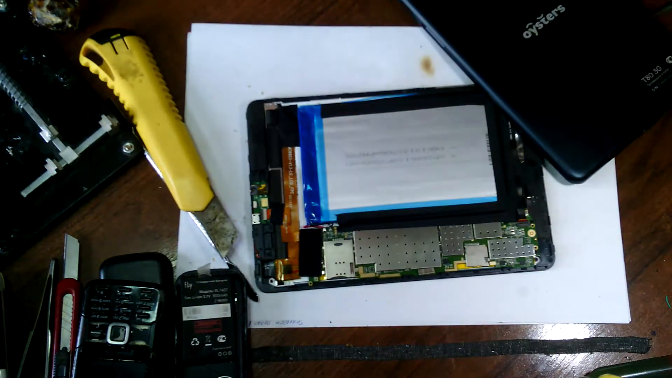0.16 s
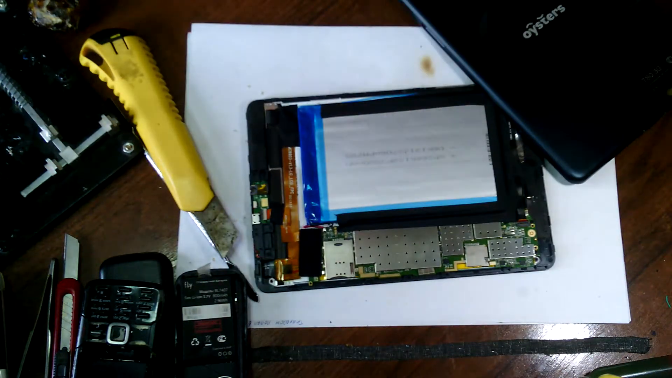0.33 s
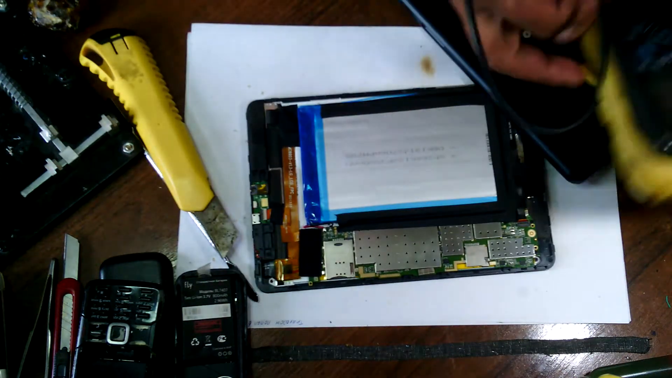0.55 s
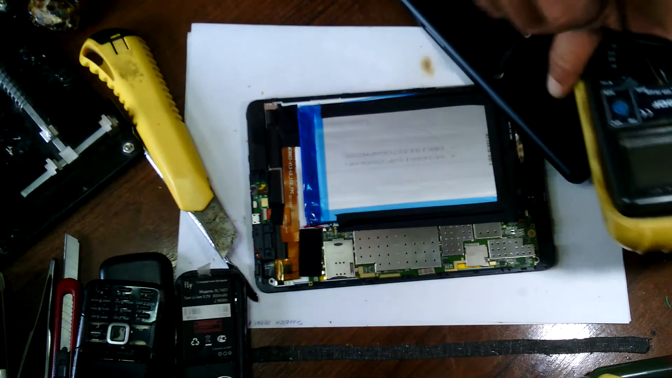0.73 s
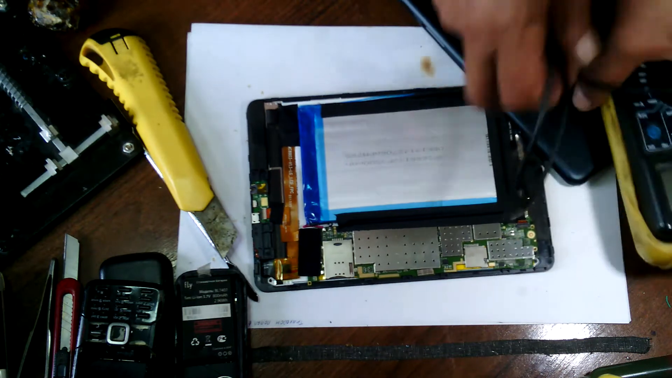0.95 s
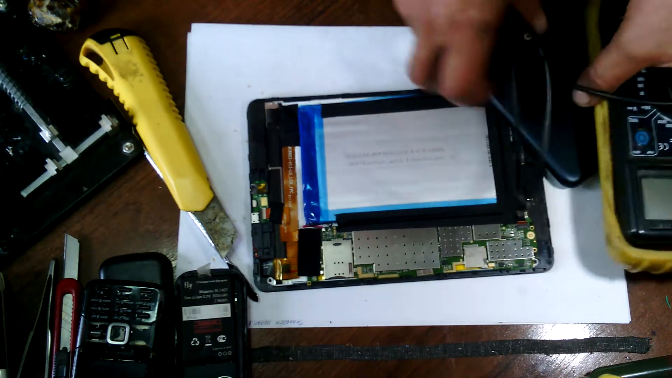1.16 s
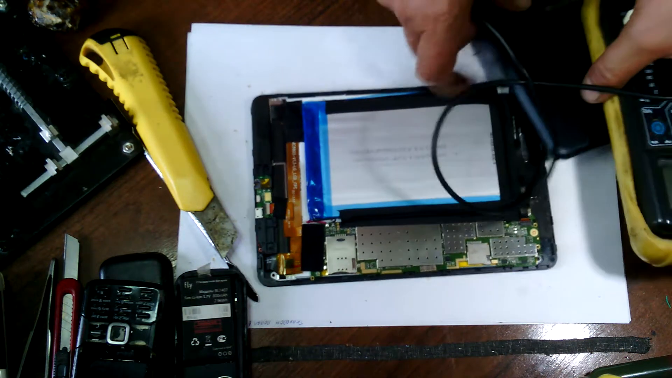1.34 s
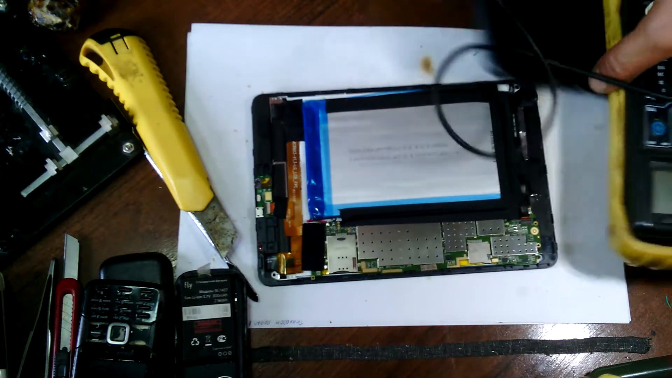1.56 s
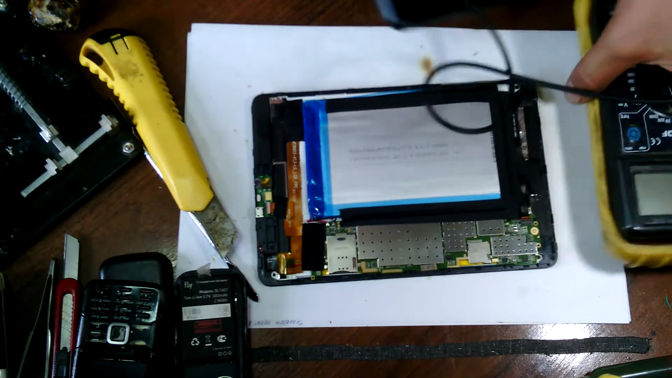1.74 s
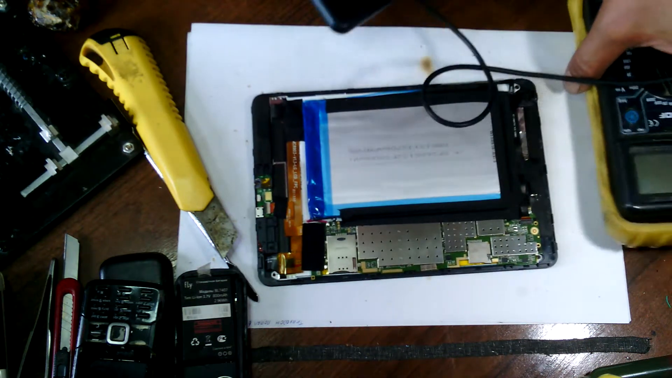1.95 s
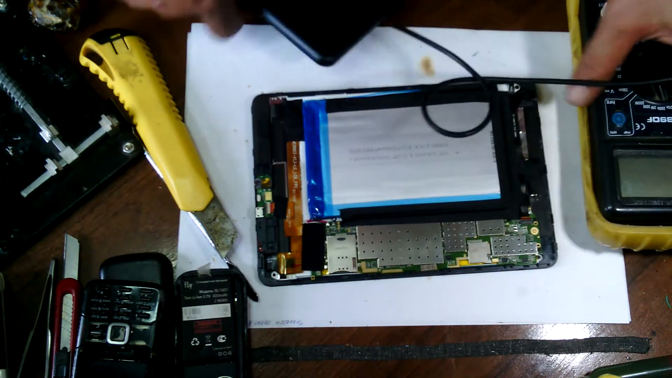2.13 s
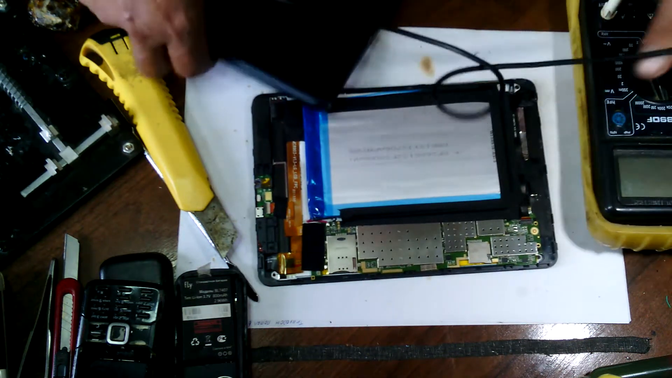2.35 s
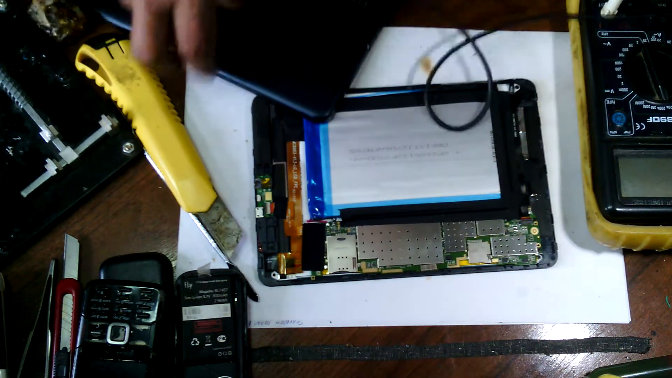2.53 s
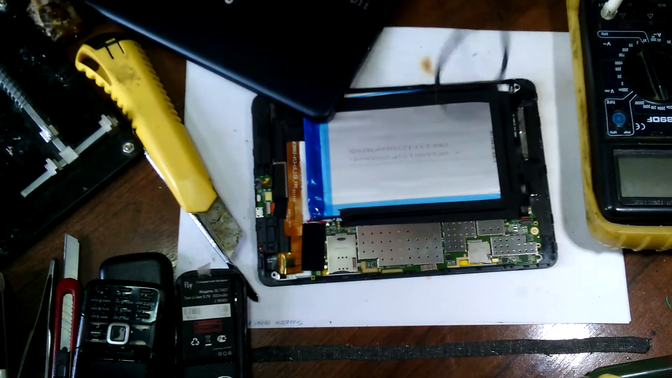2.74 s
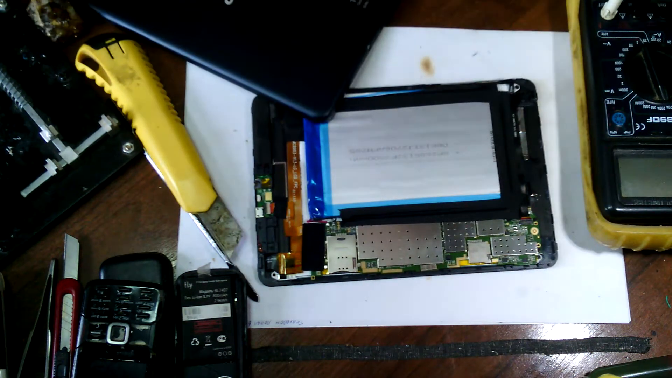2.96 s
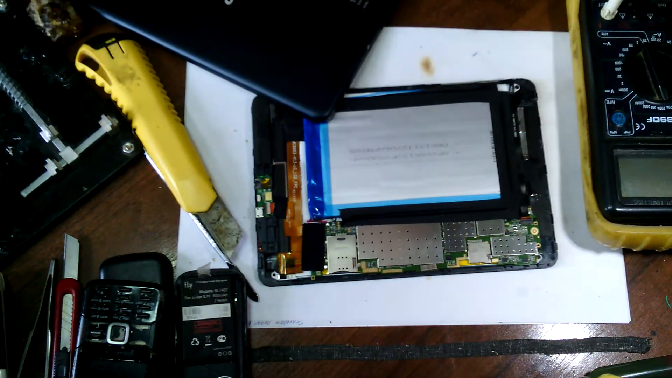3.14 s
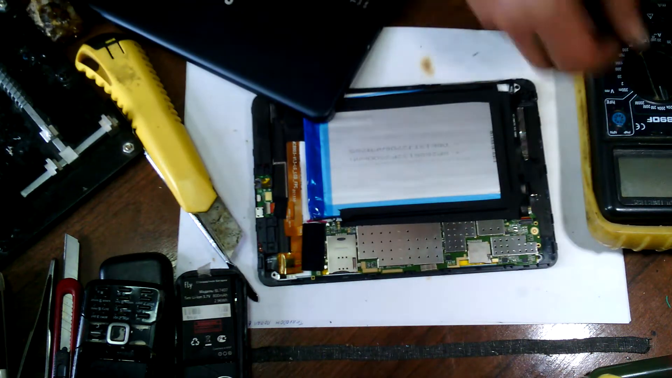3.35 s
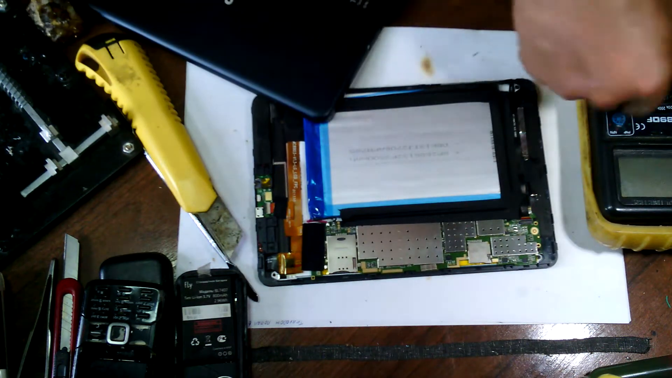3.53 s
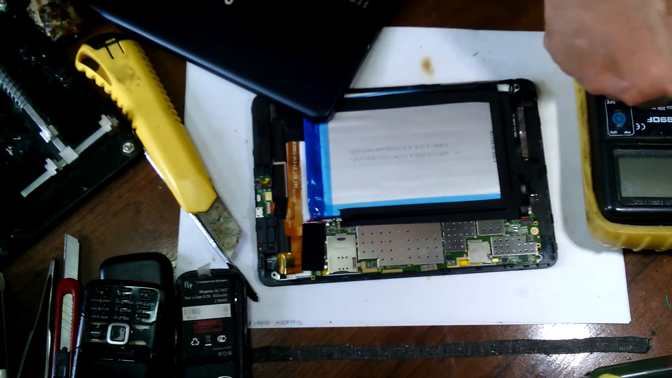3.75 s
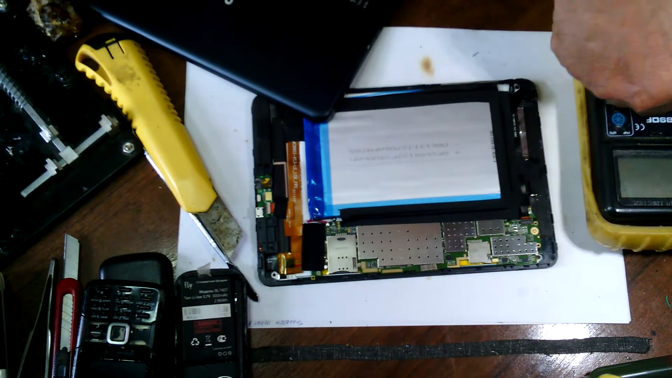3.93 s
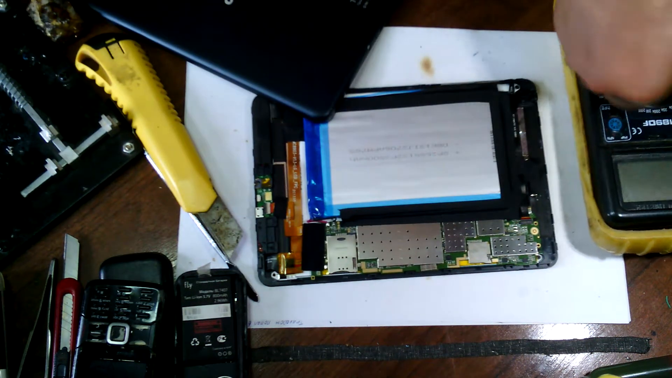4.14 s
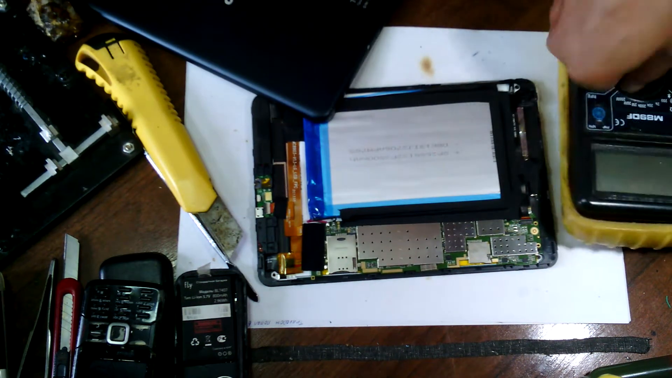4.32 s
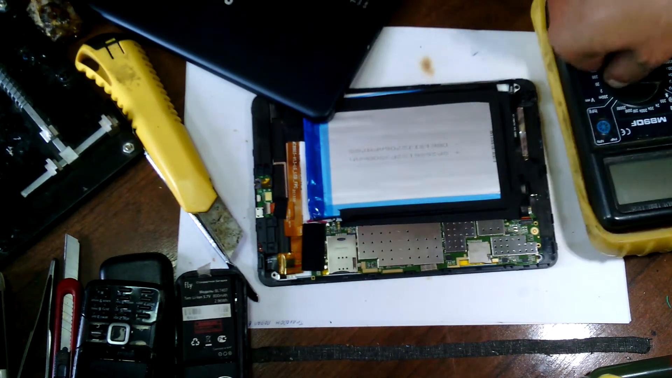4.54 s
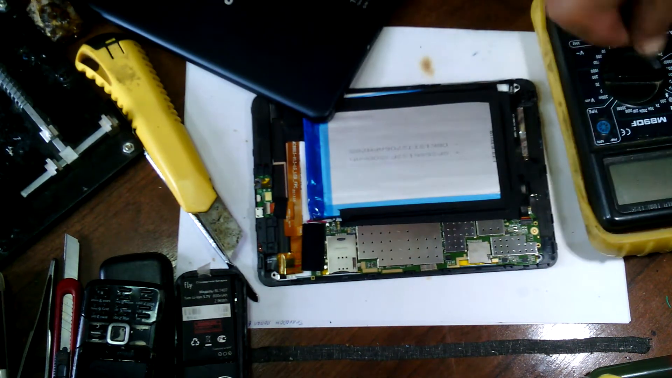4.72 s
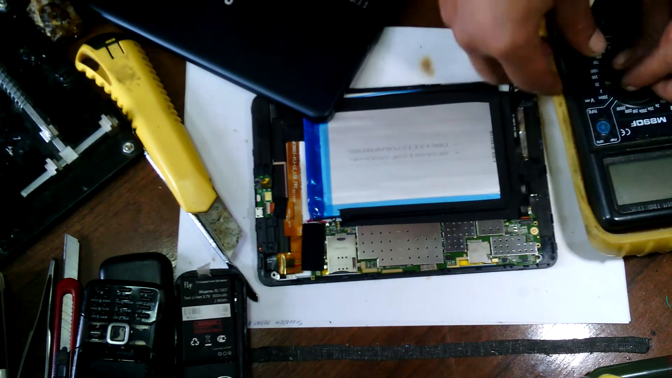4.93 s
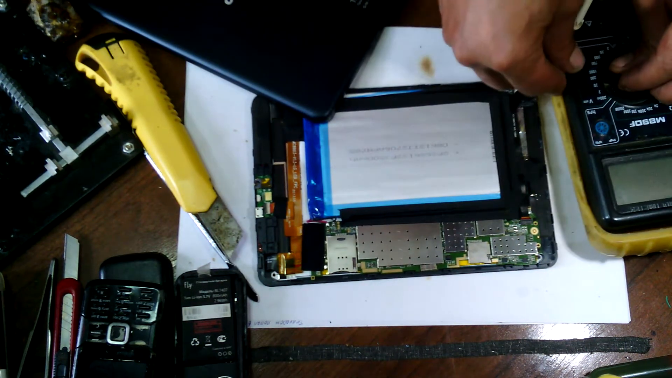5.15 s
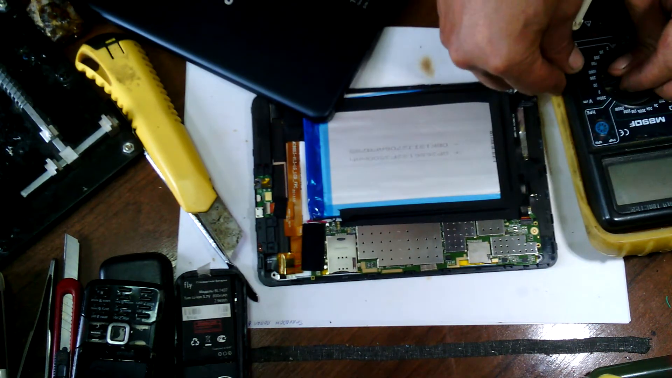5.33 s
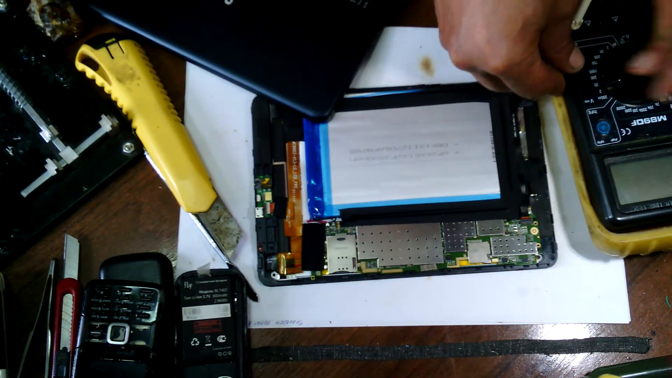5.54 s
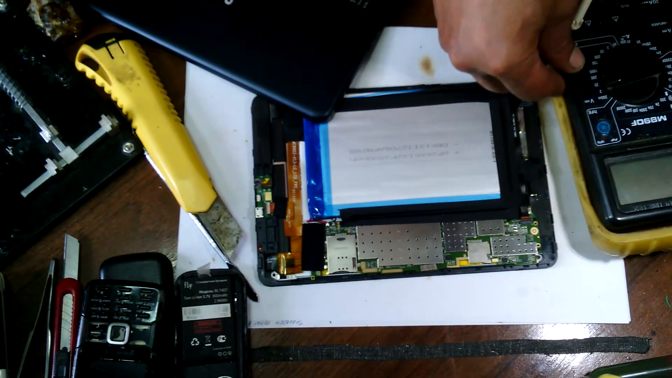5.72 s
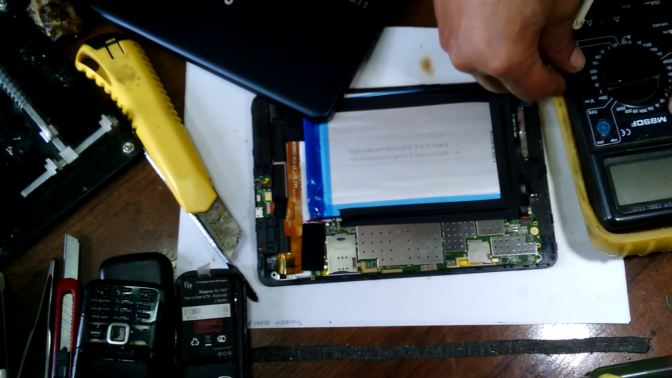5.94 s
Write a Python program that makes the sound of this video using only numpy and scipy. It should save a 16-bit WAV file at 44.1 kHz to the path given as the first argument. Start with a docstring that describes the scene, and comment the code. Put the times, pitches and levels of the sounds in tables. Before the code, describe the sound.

Close, hard handling noises on a workbench: quick knocks, a loud scraping clatter of a thin cover, a soft bouncing thud, small meter taps.

```python
"""A faint hiss and a soft rumble of a hand on a wooden bench come first; then a multimeter bumps a thin metal cover.
The cover is lifted, knocked, slips free and is laid down with a scraping clatter, all close to the microphone.
A knock and a duller, bouncing clatter follow, and the meter is nudged into place.
Knocks are modal rings with noise cracks, scrapes are noise-driven resonances, squeaks are gliding narrow bands,
and the bench booms in a few low modes."""
import sys
import numpy as np
from scipy import signal
from scipy.fft import rfft, irfft
from scipy.io import wavfile

SR = 44100
rng = np.random.default_rng(int(sys.argv[2]) if len(sys.argv) > 2 else 0)


def to_wav(s):
    """Save 16-bit WAV."""
    ch = np.atleast_2d(s).T  # columns
    pcm = np.round(np.clip(ch, -1, 1) * 32767)  # PCM
    wavfile.write(sys.argv[1], SR, pcm.astype(np.int16))


N = 268128
TIME = np.arange(SR // 2) / SR  # the clock of one impact (s)


def amp(db):
    """Logarithmic level: decibels become an amplitude gain."""
    return 10 ** (np.asarray(db) / 20)


def unit(x):
    """Normalisation: scales a signal to an rms of 1."""
    return x / np.sqrt(np.mean(x ** 2) + 1e-20)


def add(mix, start_s, sound):
    """Superposition: adds a sound into the mix from start_s, in place."""
    part = mix[round(start_s * SR):][:len(sound)]
    part += sound[:len(part)]


def decay(t60_s):
    """Exponential damping: the amplitude falls 60 dB in t60_s."""
    return np.exp(-np.log(1000) * TIME / t60_s)


def colour(x, points):
    """Spectral shaping: applies gains (dB) interpolated over log frequency (Hz)."""
    hz, db = np.transpose(points)
    f = np.fft.rfftfreq(len(x), 1 / SR)
    gain_db = np.interp(np.log(f + 1), np.log(hz), db)
    return irfft(rfft(x) * amp(gain_db), len(x))


def bands(x, low_hz=900, high_hz=2800):
    """Band splitting: low, middle and high parts that sum to the whole."""
    f = np.fft.rfftfreq(len(x), 1 / SR)
    low = 1 / (1 + (f / low_hz) ** 12)
    below_high = 1 / (1 + (f / high_hz) ** 12)
    return irfft(rfft(x) * np.array([low, below_high - low, 1 - below_high]), len(x))


def resonate(x, hz, width_hz):
    """Simple resonance: one damped mode driven by x."""
    b, a = signal.iirpeak(hz, hz / width_hz, fs=SR)
    return signal.lfilter(b, a, x)


def stroke(start_s, peak_s, end_s, curve=1.2):
    """Contact pressure: swells from zero to a peak and lets go."""
    t = np.arange(start_s, max(end_s, start_s + 0.02), 1 / SR)
    return np.interp(t, [start_s, peak_s, end_s], [0, 1, 0]) ** curve


# Centres of the low, middle and high bands: pitch_hz [Hz]
BAND_CENTRES_HZ = [625, 1660, 5000]


def voiced(x, levels_db, seconds):
    """Spectral balance: a smooth tilt brings the opening's three band levels close to levels_db."""
    f = np.fft.rfftfreq(len(x), 1 / SR)
    edges_hz = [(170, 900), (900, 2800), (2800, 7800)]
    masks = np.array([(f > lo) & (f <= hi) for lo, hi in edges_hz])
    for _ in range(2):
        opening = irfft(rfft(x) * masks, len(x))[:, :round(seconds * SR)]
        error_db = levels_db - 20 * np.log10(opening.std(axis=1) + 1e-12)
        x = colour(x, np.transpose([BAND_CENTRES_HZ, error_db]))
    return x


# Noise spectrum of a contact, before voicing: pitch_hz [Hz], level_db [dB]
CONTACT_SPECTRUM = [(60, -28), (150, 1), (280, -3.5), (600, 2), (1500, 0.5), (2500, -3), (3200, -8),
                    (5000, -12.5), (6500, -13), (7800, -25.5)]


def knocks(rows, modes, t60, dense_db, crack_db, clack_db, level_db, rise_s, bass_ring, treble_ring, chatter,
           crack_s=0.0076, clack_t60=0.076, bass_rise_s=0.0025, grip=0.006, fade_s=0.17,
           clack_db_per_octave=-0.9):
    """Modal impact: a crack and clack, then the object's modes and a dense wash of bench and room."""
    out = np.zeros(N)
    hz, db = np.transpose(modes)
    for start_s, *levels_db, clack_hz in rows:
        # the point of contact and the grip change each mode's share and pitch a little
        share, detune, phase = rng.standard_normal((len(hz), 3)).T
        # the loose contact chatters, which blurs the upper modes and leaves the low ones clean
        clock = TIME + chatter * np.cumsum(rng.standard_normal(len(TIME))) / SR
        turns = np.outer(hz * (1 + grip * detune), clock) + phase[:, None]
        ring = unit(amp(db + 2 * share) @ np.sin(2 * np.pi * turns))
        wash, crack = (unit(colour(n, CONTACT_SPECTRUM)) for n in rng.standard_normal((2, len(TIME))))
        band_decays = [decay(t60 * k) for k in (bass_ring, 1, treble_ring)]
        body = bands(ring + amp(dense_db) * wash) * band_decays
        body *= np.exp(-(TIME / fade_s) ** 3)  # the last of the ring dies away quickly
        parts = body + amp(crack_db) * bands(crack) * np.exp(-TIME / crack_s)
        parts[0] *= 1 - np.exp(-TIME / bass_rise_s)
        # the struck spot has a fast-dying resonance of its own
        octaves = np.log2(clack_hz / BAND_CENTRES_HZ[1])
        clack_gain = amp(clack_db + clack_db_per_octave * octaves)
        clack = clack_gain * decay(clack_t60) * np.sin(2 * np.pi * clack_hz * clock)
        hit = (parts.sum(axis=0) + clack) * (1 - np.exp(-TIME / rise_s))
        add(out, start_s, voiced(hit, levels_db, 0.02)[:SR * 2 // 5])
    return amp(level_db) * out


# Knocks; band levels aim at the first 20 ms, before each object's overall gain:
# start_s [s], low_level_db [dB], middle_level_db [dB], high_level_db [dB], clack_pitch_hz [Hz],
# bench_weight_db [dB, before the bench gain], what rings [name]
KNOCKS = [(0.516, -23, -16, -26, 2255, -49.5, "pinned cover"),
          (0.523, -20, -23, -28.5, 656, -34, "pinned cover"),
          (0.552, -21.5, -19, -22.5, 1097, -45, "pinned cover"),
          (0.572, -23, -17, -29, 1285, -34.5, "pinned cover"),
          (0.583, -23.5, -39.5, -38, 233, -50, "pinned cover"),
          (0.603, -28.5, -26, -46.5, 1050, -50.5, "pinned cover"),
          (0.646, -28, -21, -30, 1653, -41, "pinned cover"), (0.965, -46, -48, -62, 999, -38.5, "meter"),
          (1.144, -28, -24.5, -33.5, 1930, -34.5, "pinned cover"),
          (1.374, -32.5, -34, -34, 6460, -32, "held cover"),
          (1.572, -21, -20, -29.5, 2440, -38, "held cover"),
          (1.658, -26, -27.5, -27.5, 6400, -55, "held cover"),
          (1.942, -32.5, -43, -58, 688, -32.5, "meter"),
          (2.038, -16.5, -15.5, -18, 1437, -30, "held cover"),
          (2.08, -15, -18.5, -18.5, 775, -29, "held cover"),
          (2.216, -12.5, -14, -19.5, 727, -23, "laid cover"),
          (2.237, -12, -15.5, -26.5, 641, -45.5, "laid cover"),
          (2.29, -16.5, -17.5, -16.5, 5520, -44, "laid cover"),
          (2.322, -17, -17, -25, 574, -25, "laid cover"), (2.36, -19, -19.5, -32, 2750, -45, "laid cover"),
          (2.405, -15.5, -14, -23, 1296, -35, "laid cover"), (2.477, -23, -32, -31, 606, -49, "laid cover"),
          (2.524, -16, -15, -14.5, 2317, -41.5, "laid cover"),
          (2.642, -37, -35.5, -37.5, 2800, -40, "laid cover"),
          (2.877, -49, -69, -74, 520, -63, "laid cover"), (3.467, -29, -28.5, -36.5, 1830, -47, "set down"),
          (3.505, -29.5, -38.5, -48, 319, -43, "set down"), (4.004, -34.5, -72, -70, 284, -32.5, "meter"),
          (4.077, -47, -55.5, -62, 713, -55, "meter"), (4.121, -41.5, -39, -35.5, 6480, -40.5, "meter"),
          (4.155, -52, -41, -41.5, 6630, -38, "meter"), (4.199, -50, -50, -43.5, 6540, -55, "meter"),
          (4.249, -51.5, -47, -74, 1890, -60, "meter"), (4.323, -36, -44, -64, 690, -31.5, "meter"),
          (4.345, -49, -48, -48, 700, -63, "meter"), (4.433, -50, -45, -51, 1900, -41, "meter"),
          (4.464, -42.5, -39.5, -40, 430, -40, "meter"), (4.496, -36.5, -40.5, -38, 722, -44, "meter"),
          (4.539, -51, -39, -42, 1640, -49, "meter"), (4.933, -49.5, -58, -61.5, 507, -67, "meter"),
          (4.997, -46, -66, -68, 740, -59, "meter"), (5.103, -51, -61, -72, 870, -54, "meter"),
          (5.173, -53.5, -66, -75, 710, -58, "meter")]


def knocks_on(name):
    """Source selection: the knocks that ring one object, without weight and name."""
    return [row for *row, weight_db, what in KNOCKS if what == name]


# Modes of the cover with the meter on it, before random spread: pitch_hz [Hz], level_db [dB]
METER_ON_COVER_MODES = [(233, -3.5), (378, -6.5), (439, -2.5), (596, -4), (665, -1), (972, 1.5),
                        (1044, 7.5), (1238, -15), (1314, 0), (1653, -9), (1799, 4), (2262, -4), (2326, -17),
                        (4250, -13), (4365, -6.5), (5473, -6), (6048, -8.5), (6745, -24)]


def pinned_cover():
    """Plate modes: the meter bumps the cover, whose bass outlasts its treble."""
    return knocks(knocks_on("pinned cover"), METER_ON_COVER_MODES, t60=0.32, dense_db=-1.5, crack_db=2.5,
                  clack_db=5, level_db=-4.5, rise_s=0.00085, bass_ring=1.06, treble_ring=0.66, chatter=0.15)


# Modes of the cover held in the hand, before random spread: pitch_hz [Hz], level_db [dB]
COVER_HELD_MODES = [(238, -4.5), (335, -7.5), (428, -4), (655, -1), (732, -8), (803, 0.5), (1065, -6.5),
                    (1230, -10.5), (1412, -8.5), (1490, -0.5), (2278, -7), (2538, -8), (2767, -7),
                    (3486, -8), (3640, -9.5), (4315, -15.5), (5503, -14.5), (5673, -9), (6193, -10.5)]


def held_cover():
    """Plate modes: the lifted cover is knocked, with a strong noise crack at each contact."""
    return knocks(knocks_on("held cover"), COVER_HELD_MODES, t60=0.24, dense_db=-1, crack_db=6, clack_db=3,
                  level_db=-3.5, rise_s=0.00062, bass_ring=1.05, treble_ring=0.87, chatter=0.14)


# Modes of the cover laid on the bench, before random spread: pitch_hz [Hz], level_db [dB]
COVER_LAID_MODES = [(223, -4), (342, -5.5), (467, -6.5), (552, 0), (698, -3.5), (782, -8.5), (991, -6.5),
                    (1065, -4), (1323, -2.5), (1526, -5.5), (1631, -3.5), (1817, -5), (1974, -8.5),
                    (2221, -4), (2348, -17.5), (2448, -8.5), (2794, -1.5), (3616, -8.5), (4829, -13),
                    (5121, -11), (5654, -10.5), (5774, -14), (6219, -18), (6550, -10.5)]


def laid_cover():
    """Plate modes: the cover clatters onto the bench, its mode pitches varying more from knock to knock."""
    return knocks(knocks_on("laid cover"), COVER_LAID_MODES, t60=0.22, dense_db=-2.5, crack_db=5,
                  clack_db=3.5, level_db=-5, rise_s=0.0006, bass_ring=1.17, treble_ring=0.86,
                  chatter=0.13, grip=0.0138)


# Slides over the bench; band levels before pressure and overall gain:
# start_s [s], peak_s [s], end_s [s], low_level_db [dB], middle_level_db [dB], high_level_db [dB]
SLIDES = [(0.916, 0.938, 0.995, -58, -44, -40.5), (1.16, 1.2, 1.37, -42.5, -47, -65),
          (1.322, 1.348, 1.41, -32.5, -29.5, -37.5), (1.491, 1.51, 1.64, -51.5, -38, -40),
          (2.09, 2.11, 2.27, -32, -31.5, -43.5), (2.22, 2.32, 2.49, -22.5, -20.5, -32),
          (2.461, 2.527, 2.57, -17.5, -26, -42), (2.523, 2.554, 2.645, -35, -21, -25.5)]


def slides(catches_per_s=800, rub=0.12, width_hz=30, body_db=5, level_db=-3, grip=0.02):
    """Forced resonance: tiny random catches of a sliding edge drive the cover's modes."""
    out = np.zeros(N)
    for start_s, peak_s, end_s, *levels_db in SLIDES:
        press = stroke(start_s, peak_s, end_s, curve=0.97)
        size, chance, rubbing = rng.standard_normal(SR), rng.random(SR), rng.standard_normal(SR)
        drive = size * (chance < catches_per_s / SR) + rub * rubbing
        body = np.zeros(SR)
        for hz, db in COVER_LAID_MODES:
            body += amp(db) * resonate(drive, hz * (1 + grip * rng.standard_normal()), width_hz)
        scrape = unit(colour(drive, CONTACT_SPECTRUM)) + amp(body_db) * unit(body)
        scrape = voiced(scrape, levels_db, 0.93)
        add(out, start_s, press * scrape[-len(press):])  # the end, where the resonances have built up
    return amp(level_db) * out


# Rubbing that sings in one resonance of the cover or bench; levels before pressure:
# start_s [s], end_s [s], first_pitch_hz [Hz], last_pitch_hz [Hz], level_db [dB]
SQUEAKS = [(0.662, 0.85, 1110, 1107, -39.5), (0.704, 0.909, 1570, 1548, -42.5),
           (0.925, 0.98, 2650, 2540, -46), (0.93, 0.981, 1885, 1700, -50), (1.092, 1.15, 277, 337, -46.5),
           (1.17, 1.598, 1094, 1071, -45), (1.472, 1.58, 2770, 2695, -47.5),
           (1.495, 1.569, 913, 796, -35.5), (1.931, 1.954, 2276, 2110, -46), (2.477, 2.52, 2900, 2410, -30),
           (2.535, 2.656, 240, 250, -32)]


def squeaks(width_share=0.097, peak_share=0.34, overtone_ratio=1.6, overtone_db=-14):
    """Narrow-band friction: uneven rubbing in one resonance and a fainter one above glides with the contact."""
    out = np.zeros(N)
    for start_s, end_s, first_hz, last_hz, level_db in SQUEAKS:
        peak_s = start_s + peak_share * (end_s - start_s)
        press = stroke(start_s, peak_s, end_s, curve=0.74)
        turns = np.cumsum(np.geomspace(first_hz, last_hz, len(press))) / SR
        b, a = signal.butter(2, width_share * first_hz / 2, fs=SR)
        for ratio, part_db in (1, 0), (overtone_ratio, overtone_db):
            # slow complex noise wavers both loudness and phase
            waver = signal.lfilter(b, a, np.array([1, 1j]) @ rng.standard_normal((2, SR)))
            tone = (waver[-len(press):] * np.exp(2j * np.pi * ratio * turns)).real
            add(out, start_s, amp(level_db + part_db) * press * unit(tone))
    return out


def soft_blows(rows, modes, rise_s, spread, fade_s):
    """Slow excitation: a push swells into clean modes that soon fade; a harder one lifts the upper modes."""
    out = np.zeros(N)
    swell = (1 - np.exp(-TIME / rise_s)) * np.exp(-(TIME / fade_s) ** 2)
    for start_s, level_db, hard_db in rows:
        for k, (hz, db, t60) in enumerate(modes):
            pitch_hz = hz * (1 + spread * rng.standard_normal())
            ring = decay(t60) * np.sin(2 * np.pi * pitch_hz * TIME)
            add(out, start_s, amp(level_db + db + hard_db * (k > 0)) * ring * swell)
    return out


# Modes of the freed cover, before swell and fade: pitch_hz [Hz], level_db [dB], t60_s [s]
FREE_MODES = [(785, -20, 0.28), (716, -27.5, 0.19), (474, -26, 0.13), (298, -30.5, 0.48), (1300, -40, .14),
              (2400, -24.5, 0.098), (3320, -47, 0.28)]


def cover_slips_free(start_s=1.686):
    """Free vibration: the cover slips free and rings in a few clean modes."""
    return soft_blows([(start_s, 0, 0)], FREE_MODES, rise_s=0.0085, spread=0.001, fade_s=0.1)


# Modes of an object set down, before random spread: pitch_hz [Hz], level_db [dB]
SET_DOWN_MODES = [(230, 2), (301, -13), (381, -1), (538, -12.5), (637, -2.5), (766, -8), (993, -9),
                  (1112, -6.5), (1279, -12), (1634, -10), (1811, -10), (1908, -22), (2355, -12),
                  (2681, -12)]


def set_down():
    """Modal impact: an object set down on the bench knocks twice."""
    return knocks(knocks_on("set down"), SET_DOWN_MODES, t60=0.25, dense_db=1, crack_db=6, clack_db=5,
                  level_db=-2.5, rise_s=0.00076, bass_ring=0.92, treble_ring=0.75, chatter=0.18)


# First bounce, before the overall gain, in low, middle and high bands: level_db [dB]
BOUNCE_FIRST_DB = [-32.5, -34.5, -42.5]
# Loss at each further bounce in the same bands: loss_db [dB]
BOUNCE_LOSS_DB = [1, 7, 10]


def cushioned_bounces(first_s=3.645, gap_s=0.031, clack_hz=393, count=4):
    """Inelastic rebound: evenly spaced bounces of a cushioned object, each softer and duller."""
    rows = []
    for k in range(count):
        levels_db = np.subtract(BOUNCE_FIRST_DB, k * np.array(BOUNCE_LOSS_DB))
        rows.append((first_s + k * gap_s, *levels_db, clack_hz))
    dull = knocks(rows, SET_DOWN_MODES, t60=0.26, dense_db=-3.5, crack_db=-4, clack_db=-0.5, level_db=-2,
                  rise_s=0.0036, bass_ring=0.7, treble_ring=0.55, chatter=0.18, grip=0.019)
    # a cushioned contact has no top
    return signal.sosfilt(signal.butter(10, 4000, fs=SR, output="sos"), dull)


# Modes of the meter, before random spread: pitch_hz [Hz], level_db [dB]
METER_MODES = [(540, -11), (707, -6), (880, -8), (1684, -6), (1832, -10), (3881, -10.5), (5394, -16),
               (6360, -8.5)]


def meter_nudges():
    """Modal impact: the meter's short, chattering knocks as it is nudged about."""
    return knocks(knocks_on("meter"), METER_MODES, t60=0.19, dense_db=-1, crack_db=2, clack_db=6, level_db=-5,
                  rise_s=0.00078, bass_ring=1.27, treble_ring=0.79, chatter=0.26, clack_t60=0.1)


# Bench-top modes, before spread, swell and fade: pitch_hz [Hz], level_db [dB], t60_s [s]
BENCH_MODES = [(86.3, 0, 0.36), (133, -3, 0.19), (182, -16, 0.19), (225, -15, 0.089)]
# How hard each object meets the bench: name -> lift of the upper modes, level_db [dB]
HARDNESS_DB = {"pinned cover": 6.5, "held cover": -6, "laid cover": 4.5, "set down": 9.5, "meter": 1}
# Soft drags of a hand, before pressure: start_s [s], peak_s [s], end_s [s], level_db [dB]
HAND_DRAGS = [(0.22, 0.24, 0.31, -54.5), (4.97, 5.17, 5.34, -48.5), (5.52, 5.59, 5.66, -50),
              (5.79, 5.83, 5.89, -51.5)]


def bench(lead_s=0.0062, level_db=13.5, drag_width_hz=24, drag_soft_db=-11):
    """Driven panel: the bench top booms under each knock's weight and rumbles under a dragging hand."""
    pushes = [(s - lead_s, weight_db, HARDNESS_DB[what]) for s, *_, weight_db, what in KNOCKS]
    boom = amp(level_db) * soft_blows(pushes, BENCH_MODES, rise_s=0.048, spread=0.024, fade_s=0.11)
    for start_s, peak_s, end_s, drag_db in HAND_DRAGS:
        press = stroke(start_s, peak_s, end_s, curve=0.73)
        rub = rng.standard_normal(SR)
        rumble = np.zeros(SR)
        for k, (hz, db, _) in enumerate(BENCH_MODES):
            mode = resonate(resonate(rub, hz, drag_width_hz), hz, drag_width_hz)
            rumble += amp(db + drag_soft_db * (k > 0)) * mode
        add(boom, start_s, amp(drag_db) * press * unit(rumble[-len(press):]))
    # the boom is thinned below 66 Hz
    return signal.sosfilt(signal.butter(4, 66, "high", fs=SR, output="sos"), boom)


# Spectrum of the steady hiss, before its overall level: pitch_hz [Hz], level_db [dB]
HISS_SPECTRUM = [(15, -37), (25, 0), (95, -7.5), (127, -9), (174, -8), (215, -11), (339, -10), (574, -13.5),
                 (632, -11.5), (926, -17.5), (1490, -18.5), (7600, -24.5), (9880, -55.5), (16700, -120)]


def steady_hiss(level_db=-58.5):
    """Stationary noise: random samples shaped by a fixed spectrum."""
    return amp(level_db) * unit(colour(rng.standard_normal(N), HISS_SPECTRUM))


def scene():
    """Linear superposition: all the handling over a steady hiss, as one channel."""
    mix = pinned_cover() + held_cover() + laid_cover()
    mix += set_down() + cushioned_bounces() + meter_nudges()
    mix += cover_slips_free()
    hiss = steady_hiss()
    return (mix + bench() + slides() + squeaks() + hiss)[None]


def record(dry, ceiling=1.0, cut_hz=7750):
    """Soft saturation and band limiting: peaks are rounded off, then the top is cut steeply."""
    rounded = ceiling * np.tanh(dry / ceiling)
    edge = signal.firwin(221, cut_hz, window=("kaiser", 7), fs=SR)
    return signal.oaconvolve(rounded, edge[None], "same")


dry = scene()
out = record(dry)
to_wav(out)
```